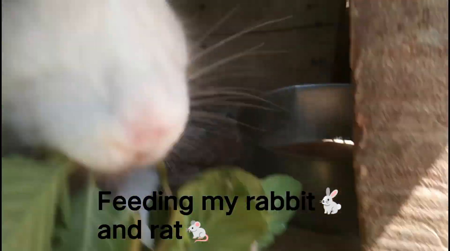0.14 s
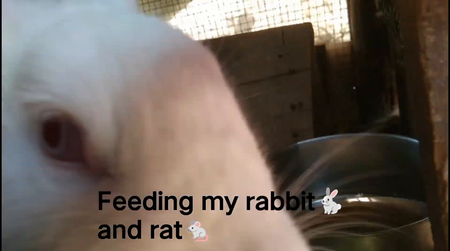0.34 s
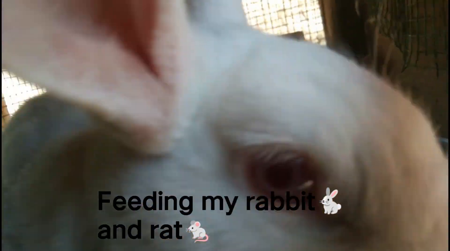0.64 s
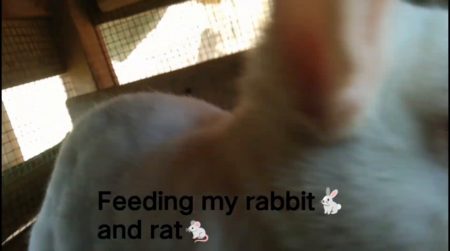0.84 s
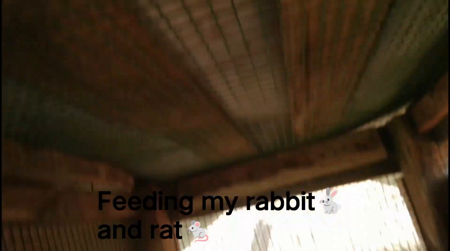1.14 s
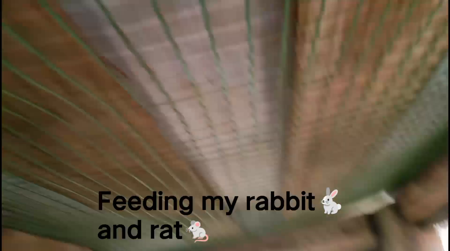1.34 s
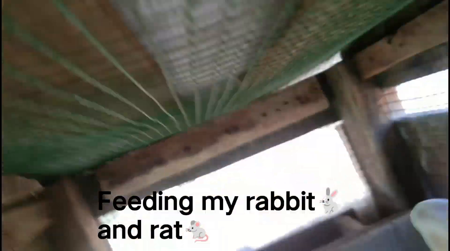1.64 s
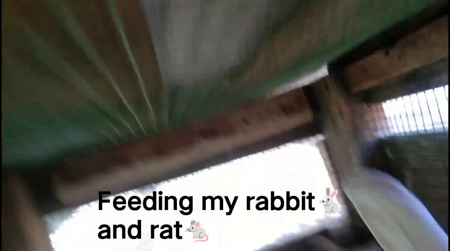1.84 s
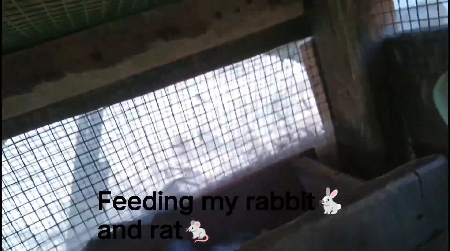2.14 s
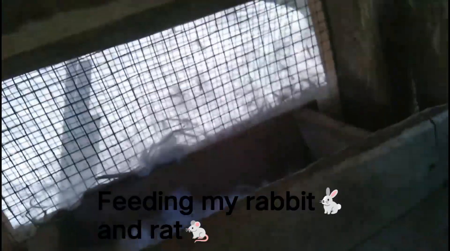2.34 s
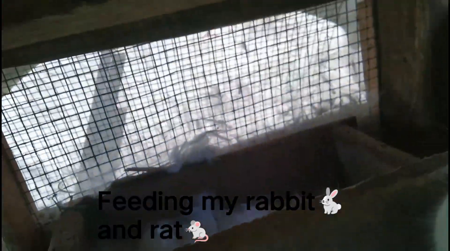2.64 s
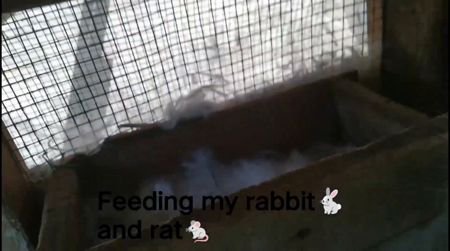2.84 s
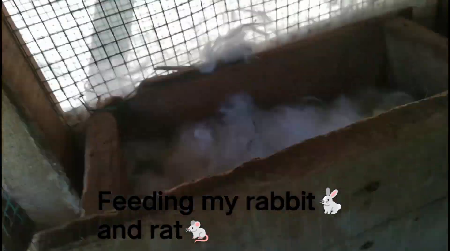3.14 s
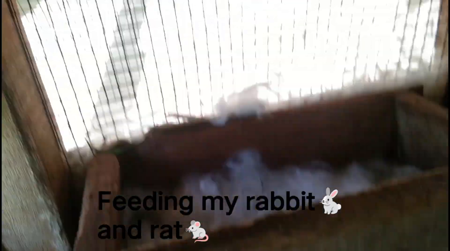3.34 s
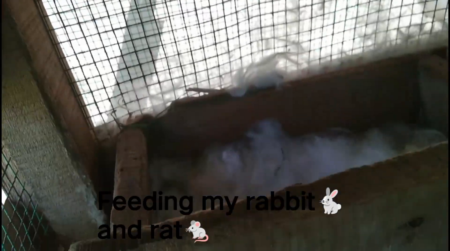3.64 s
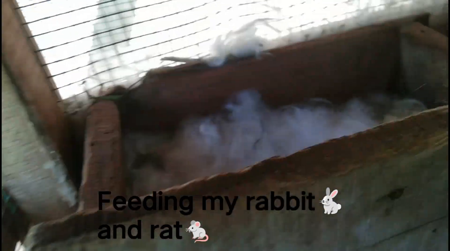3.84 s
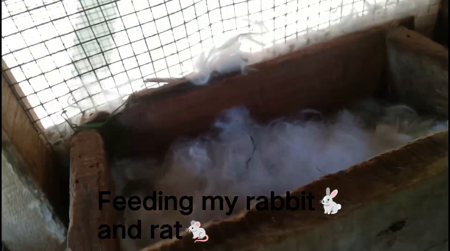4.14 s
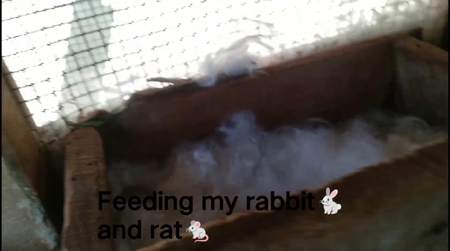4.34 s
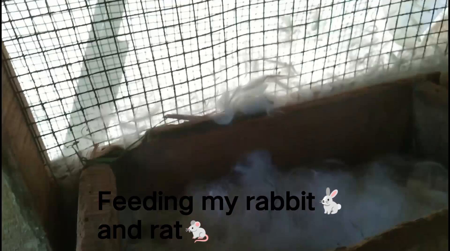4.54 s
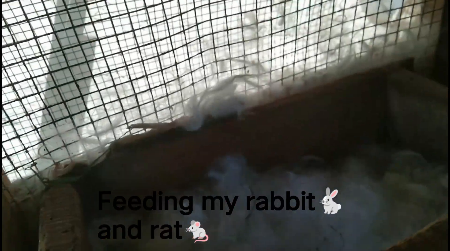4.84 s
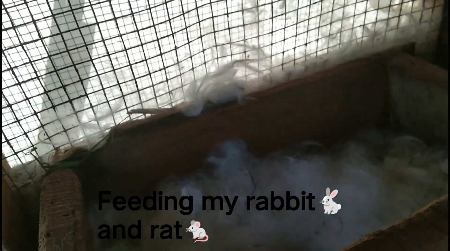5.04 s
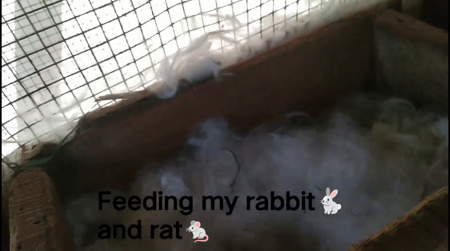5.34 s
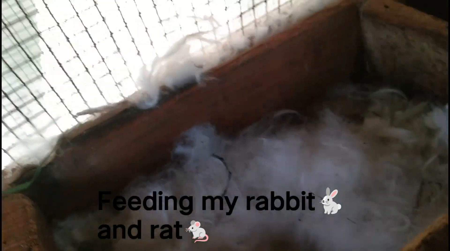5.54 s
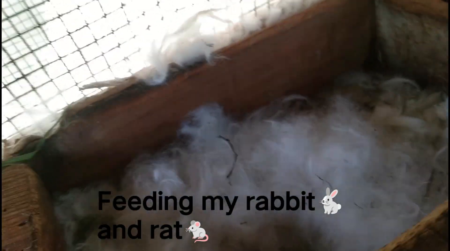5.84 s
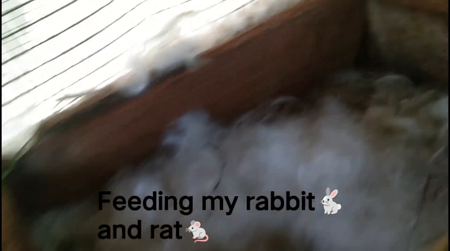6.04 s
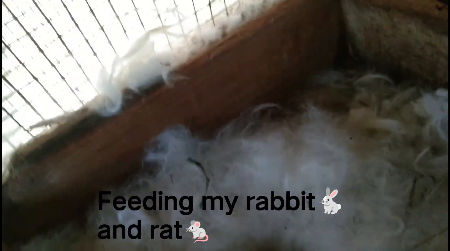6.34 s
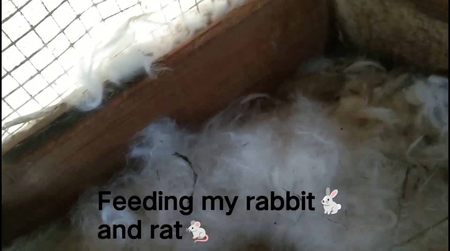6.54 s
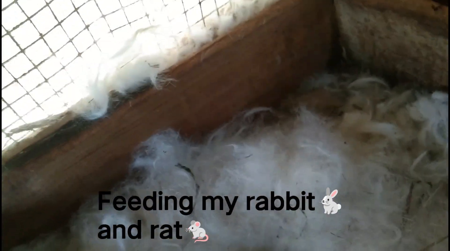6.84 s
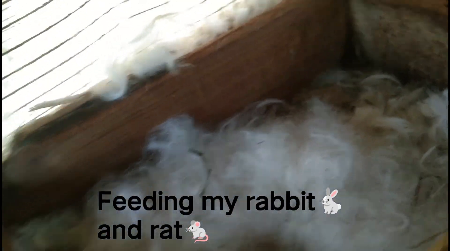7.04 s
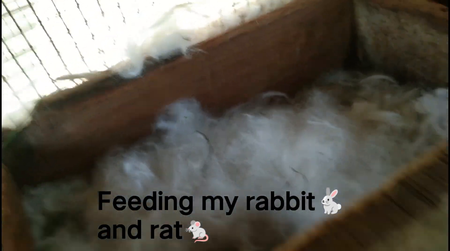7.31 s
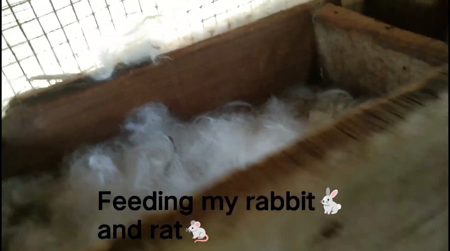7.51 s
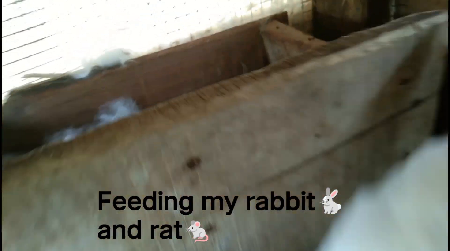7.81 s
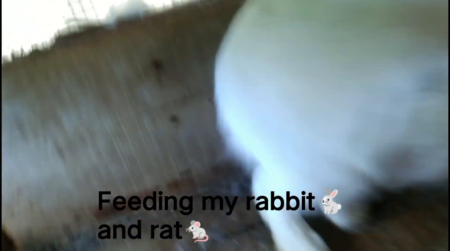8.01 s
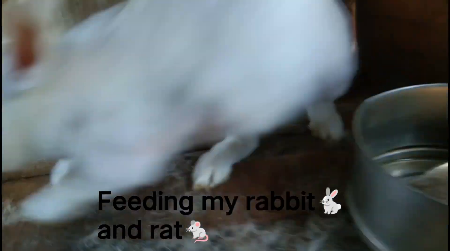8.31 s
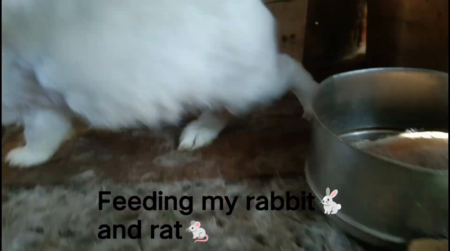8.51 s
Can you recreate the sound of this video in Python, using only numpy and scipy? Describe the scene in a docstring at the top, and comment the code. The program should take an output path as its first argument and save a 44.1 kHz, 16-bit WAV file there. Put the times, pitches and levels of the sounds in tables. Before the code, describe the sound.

Soft leaf crunching and sharp stem snaps from a rabbit in a wooden hutch, with paw thumps and a brief metal bowl clatter.

```python
"""A rabbit chews leaves in a wooden hutch, close to a small microphone.
Tiny cracks merge into a crisp rustle and a duller crunch inside the mouth; stems snap and leaves tear.
Its paws thump and shuffle on hollow boards, and knock a steel bowl that scrapes and rings briefly.
Outside, an insect trills very high over faint open air, a hiss of far insects and a few thin peeps."""
import sys
import numpy as np
from scipy import signal
from scipy.fft import rfft, irfft
from scipy.io import wavfile

SR = 44100
rng = np.random.default_rng(int(sys.argv[2]) if len(sys.argv) > 2 else 0)


def int16_out(signal):
    """Quantize to a 16-bit WAV file."""
    q = np.round(np.clip(np.atleast_2d(signal).T, -1, 1) * 32767)
    wavfile.write(sys.argv[1], SR, q.astype(np.int16))


N = 382347


def from_db(db):
    """Turns decibels into a number to multiply a sound by."""
    return 10 ** (np.asarray(db) / 20)


def rms_one(x):
    """Scales a sound so that its average strength (rms) is 1."""
    return x / np.sqrt(np.mean(x ** 2) + 1e-20)


def curves(rows):
    """Joins the rows of a table over time: one curve for each column after the first."""
    times, *columns = np.transpose(rows)
    return [np.interp(np.arange(N) / SR, times, column) for column in columns]


def coloured(x, points):
    """Makes some pitches louder than others, following (pitch [Hz], level [dB]) points; rms 1."""
    hz, level_db = np.transpose(points)
    log_hz = np.log(np.arange(1, N // 2 + 2) * SR / N)
    return rms_one(irfft(rfft(x) * from_db(np.interp(log_hz, np.log(hz), level_db)), N))


def drift(rate_hz):
    """A smooth random wobble of size about 1; a higher rate wobbles faster."""
    r = np.exp(-2 * np.pi * rate_hz / SR)
    return rms_one(signal.lfilter([1], [1, -2 * r, r * r], rng.standard_normal(N + SR))[SR:])


def ring(x, hz, ring_s):
    """Each click in x starts a tone that fades by 60 dB in ring_s seconds."""
    r, w = from_db(-60 / (ring_s * SR)), 2 * np.pi * hz / SR
    return signal.lfilter([0, np.sin(w)], [1, -2 * r * np.cos(w), r * r], x + 1e-18)


def band(x, hz, ring_s):
    """Rings x twice to keep the pitches near hz; longer ringing keeps a narrower band; rms 1."""
    return rms_one(ring(ring(x, hz, ring_s), hz, ring_s))


def grains(per_s, spread_db, size=N):
    """Random clicks of uneven size."""
    heights = from_db(spread_db * np.minimum(rng.exponential(1, size), 5)) * rng.choice([-1, 1], size)
    return heights * (rng.random(size) < per_s / SR)


def contact(seconds, size, rise=.11):
    """Strength of a touch: it grows over the share `rise` of its length, then fades."""
    progress = np.arange(size) / SR / max(seconds, 1e-4)
    return (1 - np.exp(-progress / max(rise, .005))) * np.exp(-1.6 * progress ** 2)


def swells(starts, hold_s, peak_db, rise_db_per_s, fall_db_per_s, build_db=0):
    """Follows the loudest of several swells that rise, hold (growing by build_db) and fall away."""
    times = np.arange(0, N + 88, 88) / SR
    age, hold = times - starts[:, None], np.c_[hold_s]
    slopes_db = rise_db_per_s * np.minimum(age, 0) - fall_db_per_s * np.maximum(age - hold, 0)
    level_db = peak_db[:, None] + slopes_db + build_db * (np.clip(age / hold, 0, 1) - .5)
    return np.interp(np.arange(N) / SR, times, from_db(level_db.max(axis=0)))


def add(out, start, sound, peak_db):
    """Mixes a sound into out at a start time in seconds, with the given peak."""
    piece = out[round(start * SR):][:len(sound)]
    piece += from_db(peak_db) * sound[:len(piece)] / np.abs(sound).max()


def struck(tones, push, spot_hz, octaves):
    """One push rings all the tones of an object; those near the struck spot's pitch ring most."""
    chance_db = rng.normal(0, 1.5, len(tones))
    out = 0
    for k, (hz, db, ring_s) in enumerate(tones):
        distance = np.log2(hz / spot_hz) / max(octaves, .1)
        out += from_db(db + chance_db[k] - 4.4 * distance ** 2) * ring(push, hz, ring_s) * (-1) ** k
    return out


# Tone colour of the open air: (pitch [Hz], relative level [dB])
AIR_COLOUR = [(15, -52), (25, -9), (43, -20), (92, 9.5), (170, 4), (240, -11), (317, 1), (405, 1),
              (796, -6.5), (2220, -10), (3920, -13.5), (9840, -14), (11300, -74), (12200, -50),
              (13200, -27), (16000, -44)]
def open_air():
    """A faint, mostly low rush whose level wavers slowly."""
    return from_db(-68.5 + .7 * drift(0.6)) * coloured(rng.standard_normal(N), AIR_COLOUR)


def far_insects():
    """Many insects further off merge into a steady, narrow hiss."""
    high_band = signal.butter(3, (10600, 12500), "band", fs=SR, output="sos")
    return from_db(-79.5 + 0.5 * drift(4.0)) * rms_one(signal.sosfilt(high_band, rng.standard_normal(N)))


# Thin peeps: (time [s], length [s], first pitch [Hz], last pitch [Hz], peak [dB])
PEEP_NOTES = [(0.082, 0.063, 4700, 4880, -62), (0.183, 0.046, 4450, 4400, -65),
              (1.798, 0.061, 7800, 7700, -52), (5.25, 0.077, 7000, 7000, -64),
              (5.66, 0.035, 7000, 7350, -61), (5.721, 0.044, 7200, 7000, -61), (6.39, .05, 5500, 4900, -66),
              (6.59, 0.083, 5600, 5500, -68), (8.297, 0.048, 3000, 3050, -61),
              (8.446, 0.044, 3870, 3900, -61)]
def peeps():
    """Short sliding whistles, perhaps far birds, that tremble in pitch and level."""
    out, waver = np.zeros(N), drift(126)
    for start, length, first_hz, last_hz, peak_db in PEEP_NOTES:
        at, size = round(start * SR), round(length * SR)
        hz = np.linspace(first_hz, last_hz, size) + 110 * waver[at:][:size]
        level = np.hanning(size) ** .5 * from_db(2.5 * waver[-at - size:][:size])
        add(out, start, level * np.sin(2 * np.pi * np.cumsum(hz) / SR), peak_db)
    return out


CHIRPS_PER_S, CHIRP_S, BEAT_AT_S = 35.7, .012, 6.732
CHIRP_START_HZ, CHIRP_END_HZ, CHIRP_DIP_DB = 12450, 10700, 7
# How the trill changes: (time [s], chirp start level [dB], chirp end level [dB], delay [ms])
TRILL = [(0, -70, -72, -8.5), (.35, -56, -56, -13), (1, -85, -82, -13), (2, -76, -68, -4),
         (3, -62, -71, -1), (4, -85, -86, 1), (4.75, -84, -74, 2.5), (5.0, -79, -72, 2.5),
         (5.25, -68, -74, 4), (5.45, -60, -76, -1), (6.05, -63, -85, -1.5), (6.2, -80, -80, -7),
         (6.4, -90, -90, -13), (6.5, -77, -63, -4), (7.0, -74, -61, 1.2), (7.3, -64, -70, -.3),
         (7.8, -72, -64, 1), (8.67, -78, -81, -8)]
def insect():
    """Almost evenly spaced chirps, each a quick, slightly blurred fall in pitch."""
    start_db, end_db, delay_ms = curves(TRILL)
    beats = (np.arange(N) / SR - BEAT_AT_S - delay_ms / 1000) * CHIRPS_PER_S
    progress = np.minimum((beats % 1) / (CHIRP_S * CHIRPS_PER_S), 1)   # 0 to 1 through each chirp
    hz = CHIRP_START_HZ + (CHIRP_END_HZ - CHIRP_START_HZ) * progress + 130 * drift(301)
    # each chirp sags in the middle, so a high and a low note stand out
    dip_db = CHIRP_DIP_DB * np.exp(-((progress - .5) / .12) ** 2)
    level_db = start_db + (end_db - start_db) * progress - dip_db + 1.2 * drift(500) + 0.6 * drift(8.8)
    return from_db(level_db) * np.sin(np.pi * progress) ** 0.45 * np.sin(2 * np.pi * np.cumsum(hz) / SR)


# Tone colour of the bowl's rim scraping on wood: (pitch [Hz], relative level [dB])
RIM_COLOUR = [(410, -17), (700, -15), (1330, -24), (2020, -10.5), (3070, -14.5), (3690, -11.5), (7690, -16),
              (9860, -9.5), (16000, -25)]
# The steel bowl's own tones: (pitch [Hz], relative level [dB], ring time [s])
BOWL_TONES = [(1140, 17.5, 0.047), (1473, 16, 1), (2050, -2, 0.2), (2160, -8, 0.11), (2623, 9.5, 0.18),
              (3060, 9.5, 0.051), (3710, 10.5, 0.072), (4120, 12, 0.027), (5220, 12, 0.066),
              (5600, 18, 0.028), (6370, 2, 0.04), (6900, 8, 0.036), (7700, 6, 0.052), (9200, 5, 0.038),
              (11000, 19.5, 0.021)]
# Knocks and slides: (time [s], peak [dB], contact [s], rise [share of contact], spot pitch [Hz],
# spread of ringing [octaves], scrape strength [times the ringing], longest ring the paw allows [s])
BOWL_KNOCKS = [(7.882, -53, 0.025, .3, 7300, 0.17, 0.2, 0.03),
               (7.902, -38, 0.0089, .02, 7300, 0.11, 0.25, 0.015),
               (7.912, -39.5, 0.027, .03, 7700, 0.13, 0.13, 0.015),
               (7.914, -45.5, 0.0063, .05, 2300, 2, 0.21, 0.89),
               (8.012, -25.5, 0.012, 0.5, 3440, 0.8, 1.2, 0.007),
               (8.054, -21, 0.019, 0.11, 5000, 1.3, 0.72, 0.017),
               (8.0873, -18, 0.006, .02, 3100, 0.46, 0.53, 0.0044),
               (8.093, -28, 0.012, .1, 2600, 0.37, 0.92, 0.004),
               (8.1023, -24, 0.013, 0.018, 2460, 0.33, 0.78, 0.0074),
               (8.123, -28, 0.0078, .02, 2380, 0.38, 0.98, 0.012),
               (8.179, -33.5, 0.0085, .02, 2360, 0.26, 0.43, 0.0027),
               (8.187, -29, 0.019, .3, 2100, 0.6, 2.6, 0.0019),
               (8.235, -42, 0.0062, .05, 3570, 0.91, 1.7, 0.015),
               (8.272, -48.5, 0.015, .11, 9700, 0.96, 2.6, .01)]
def bowl():
    """Each knock is a gritty scrape that rings the steel, while the paw cuts the ringing short."""
    out, grit = np.zeros(N), coloured(grains(12000, 0.62), RIM_COLOUR)
    for start, peak_db, seconds, rise, spot_hz, octaves, scrape, longest_s in BOWL_KNOCKS:
        rub = grit[round(start * SR):][:12000] * contact(seconds, size=12000, rise=rise)
        if rise < .04:   # a sudden knock starts with a tick
            rub[:14] += .7 * np.abs(rub).max() * np.sin(np.pi * np.arange(14) / 7)
        held_tones = [(hz, db, 1 / (1 / ring_s + 1 / longest_s)) for hz, db, ring_s in BOWL_TONES]
        steel = rms_one(struck(held_tones, rub, spot_hz, octaves))
        add(out, start, scrape * rms_one(rub) + steel, peak_db)
    return out


# The hollow floor's own tones: (pitch [Hz], relative level [dB], ring time [s])
FLOOR_TONES = [(120, -10.5, 0.087), (170, -25, 0.048), (190, -7.5, 0.14), (231, 13.5, 0.034),
               (280, 2, 0.066), (310, -7, 0.02), (399, 2, 0.043), (423, 0.5, 0.054), (483, 6, 0.01),
               (563, 1.5, 0.11), (670, 7, 0.064), (700, 11.5, 0.073), (910, 6.5, 0.082),
               (1064, 25.5, 0.059), (1330, 35, 0.022)]
# Paws landing: (time [s], peak [dB], spot pitch [Hz], spread of ringing [octaves])
PAW_THUMPS = [(0.12, -54, 340, 0.47), (0.248, -58, 430, 0.25), (0.354, -50.5, 600, 0.75),
              (0.544, -43.5, 142, 0.64), (0.55, -44, 1270, 0.45), (0.646, -42.5, 260, 2.9),
              (1.065, -56.5, 587, 0.24), (1.205, -50, 450, 0.35), (1.547, -37, 293, 0.5),
              (1.761, -42.5, 179, 0.12), (1.766, -48.5, 700, 0.11), (1.805, -56, 710, 0.12),
              (1.797, -56, 190, 0.27), (1.842, -44, 190, 1.1), (1.841, -49, 700, 0.14),
              (1.877, -45, 258, 0.94), (1.952, -51, 244, 0.25), (2.039, -27.5, 238, 0.38),
              (2.062, -30, 188, 0.5), (2.098, -48.5, 231, 0.12), (2.134, -47, 224, 0.064),
              (2.354, -50, 473, 0.62), (2.462, -48, 420, 1.02), (2.504, -44, 226, 0.36),
              (2.656, -45, 246, 0.8), (2.678, -40, 483, 0.81), (2.952, -40, 470, 0.79),
              (3.177, -48, 231, 0.14), (3.238, -38, 440, 0.63), (3.595, -46.5, 453, 0.66),
              (3.61, -48, 474, 0.79), (3.902, -38.5, 467, 0.26), (4.307, -52.5, 194, 0.17),
              (4.345, -55, 173, 0.48), (5.631, -45.5, 348, 2.8), (6.286, -55, 247, 0.21),
              (6.794, -57.5, 252, 0.52), (6.906, -61, 243, 0.52), (7.092, -46, 450, 0.43),
              (7.291, -44.5, 296, 0.81), (7.429, -41.5, 373, 1), (7.757, -43, 380, 0.75),
              (7.915, -49.5, 231.5, 0.087), (8.014, -25.5, 245, 0.37), (8.016, -39, 612, 0.12),
              (8.086, -33.5, 303, 0.33), (8.089, -53, 597, 0.55), (8.105, -47.5, 620, 0.67),
              (8.123, -43.5, 900, 0.56), (8.019, -49, 1040, 0.37), (8.103, -31, 263, 1.1),
              (8.188, -26.5, 280, 0.34), (8.187, -32, 730, 0.53), (8.268, -46, 293, 0.22),
              (8.408, -44, 246, .72), (8.45, -42.5, 233, 0.75), (8.499, -59, 596, 0.18)]
# Paws shuffling: (time [s], level [dB])
PAW_SHUFFLE = [(0.0, -100), (0.8, -80), (1.25, -66.5), (1.45, -71), (1.72, -64.5), (1.78, -45),
               (1.97, -62.5), (2.3, -71), (2.85, -72), (3.8, -71), (4.36, -69), (5.3, -73.5), (5.8, -76),
               (6.85, -74), (7.65, -74.5), (7.94, -54.5), (8.28, -51), (8.4, -78), (8.67, -67)]
# Fur and leaves dragging over the wood: (time [s], level [dB])
FUR_DRAG = [(0.0, -67), (0.38, -70), (1.0, -63.5), (1.28, -69.5), (2.34, -77), (2.56, -73.5), (4.42, -72.5),
            (4.6, -79), (6.71, -73.5), (6.95, -71), (7.65, -75), (8.09, -62.5), (8.26, -70), (8.67, -65)]
def floorboards():
    """Paws thump and shuffle, ringing the hollow floor, while fur and leaves drag over it."""
    thumps = np.zeros(N)
    for start, peak_db, spot_hz, octaves in PAW_THUMPS:
        seconds = np.interp(peak_db, [-50, -25], [0.011, 0.0033])   # harder landings are shorter
        scuff = rng.standard_normal(9000) * contact(seconds, size=9000)
        scuff[40] += 6.5   # the landing itself
        clack = band(scuff, spot_hz, 2.0 / spot_hz / max(octaves, .1))
        wood = rms_one(struck(FLOOR_TONES, clack, spot_hz, octaves))
        add(thumps, start, wood + 0.96 * clack, peak_db)
    shuffling = rms_one(struck(FLOOR_TONES, grains(600, 2.5), spot_hz=215, octaves=.7))
    dragging = band(grains(1500, 1.5), hz=460, ring_s=0.00059) * from_db(curves(FUR_DRAG)[0])
    # after each thump the paws shuffle on, softer and fading
    starts, peaks_db = np.transpose(PAW_THUMPS)[:2]
    settling = swells(starts, 0.0052, peaks_db - 20.5, rise_db_per_s=860, fall_db_per_s=114)
    return thumps + shuffling * np.hypot(from_db(curves(PAW_SHUFFLE)[0]), settling) + dragging


# Stems and leaf veins breaking: (time [s], peak [dB], pitch [Hz])
STEM_SNAPS = [(0.163, -36, 11100), (0.2851, -12.5, 10270), (0.2898, -53.5, 970), (0.294, -41, 11200),
              (0.2955, -36, 10800), (0.295, -47, 2500), (0.319, -38, 9970), (0.358, -56, 2380),
              (0.5418, -37, 6000), (0.5451, -19, 10500), (0.5453, -16, 5100), (0.548, -45, 1700),
              (0.6464, -38.5, 10600), (0.7531, -36, 9800), (0.835, -42, 9550), (0.841, -50.5, 6500),
              (0.888, -43, 9800), (0.9145, -42.5, 4400), (0.9147, -37.5, 9000), (0.922, -40, 11100),
              (0.934, -51, 6600), (0.9651, -40.5, 7300), (1.042, -29, 11300), (1.069, -46, 6040),
              (1.085, -44, 6500), (1.17, -43, 9000), (1.5008, -12.5, 9300), (2.0656, -47.5, 2780),
              (2.067, -39, 7700), (2.143, -51, 11900), (2.149, -43, 11000), (2.171, -36, 10200),
              (2.424, -35.5, 10600), (2.624, -34, 10700), (2.871, -40, 10500), (3.04, -42.5, 2570),
              (3.829, -45.5, 2690), (4.218, -39.5, 9300), (4.756, -36, 9450), (4.924, -45.5, 9900),
              (5.062, -52, 2880), (5.156, -60, 2600), (5.175, -54, 2700), (7.2888, -48.5, 3230),
              (7.289, -44.5, 9450), (7.8017, -55, 9900)]
def stem_snaps():
    """Each break is a click and a tone a few cycles long; loud ones ring less and click more."""
    out, click = np.zeros(N), signal.unit_impulse(600)
    sharp_click = signal.lfilter(*signal.butter(2, [1100, 12000], "band", fs=SR), click)
    faint_to_loud_db = [-25, -16]
    for start, peak_db, hz in STEM_SNAPS:
        cycles = np.interp(peak_db, faint_to_loud_db, [10, 6])
        sharpness = np.interp(peak_db, faint_to_loud_db, [0.078, 0.83])
        tone = band(click, hz, cycles / hz)
        add(out, start, tone / tone.max() + sharpness * sharp_click, peak_db)
    return out


# Bites through a leaf: (time [s], peak [dB], pitch [Hz], length [s])
LEAF_BITES = [(0.0044, -43, 3550, 0.013), (0.027, -44, 2600, 0.0089), (0.241, -47.5, 3850, 0.0081),
              (0.471, -50, 2640, 0.025), (0.677, -48, 1680, 0.0073), (0.697, -43.5, 2530, 0.0054),
              (0.768, -42.5, 8900, 0.031), (0.863, -50, 1250, 0.073), (1.06, -48, 1020, 0.034),
              (1.052, -45.5, 2500, 0.031), (1.064, -47, 3050, 0.03), (1.066, -49, 1900, 0.03),
              (1.207, -47.5, 1520, 0.038), (1.248, -48.5, 2750, 0.014), (1.545, -31, 9200, 0.013),
              (1.603, -37.5, 9400, 0.025), (1.763, -40, 1840, 0.0092), (1.764, -45, 1480, 0.013),
              (1.839, -47.5, 1670, 0.015), (2.448, -41.5, 9900, 0.013), (2.666, -51, 1600, 0.032),
              (2.876, -49.5, 2440, 0.024), (2.944, -56, 1520, 0.017), (3.028, -50, 2700, 0.024),
              (3.21, -50.5, 2260, 0.027), (3.23, -54, 1420, 0.038), (3.422, -47, 2500, 0.011),
              (3.573, -43, 9850, 0.021), (3.644, -41.5, 10200, 0.0097), (3.755, -53.5, 3260, 0.046),
              (3.831, -45, 2770, 0.0035), (3.921, -42, 9400, 0.025), (3.963, -50, 2800, 0.011),
              (4.047, -49.5, 3330, 0.021), (4.109, -52.5, 3270, 0.032), (4.3, -59.5, 1790, 0.11),
              (4.166, -52.5, 1330, 0.031), (4.207, -48.5, 2320, 0.015), (4.255, -61, 2050, 0.021),
              (4.446, -51.5, 2500, 0.023), (4.494, -57, 3080, .013), (4.654, -56, 2920, 0.0054),
              (4.68, -55.5, 3140, 0.011), (4.696, -51, 3000, 0.0063), (4.713, -60, 2640, .008),
              (4.701, -47, 9800, 0.018), (4.754, -56, 9650, 0.0068), (4.755, -47, 2780, 0.0036),
              (4.761, -46, 2710, 0.011), (4.856, -56.5, 3100, 0.011), (4.917, -61, 2600, 0.05),
              (5.072, -64, 2500, 0.026), (5.097, -58, 2560, 0.011), (5.185, -55, 2800, 0.0058),
              (5.212, -60, 2740, .015), (5.232, -55, 2700, .03), (5.207, -55, 9250, 0.017),
              (5.62, -54.5, 1620, 0.023), (5.39, -55, 2420, 0.033), (5.702, -56, 1500, 0.034),
              (5.847, -56.5, 1350, 0.022), (6.015, -66, 9250, 0.018), (6.068, -52, 6350, 0.035),
              (6.174, -52, 1370, 0.036), (6.451, -49.5, 1400, 0.038), (6.526, -53, 6160, 0.023),
              (6.676, -52.5, 1400, 0.035), (6.852, -54, 1400, 0.034), (7.023, -54, 1530, 0.03),
              (7.286, -49, 1070, 0.041), (7.288, -49, 2600, 0.015), (7.289, -47.5, 4800, 0.0085),
              (8.41, -48.5, 3300, 0.0095), (8.463, -51, 4370, 0.008), (8.553, -44.5, 1270, 0.016),
              (8.581, -49.5, 1260, 0.022), (8.647, -37.5, 10000, 0.0077)]
def bites():
    """Each bite is a burst of cracks, partly at one pitch and partly spread around it."""
    out = np.zeros(N)
    for start, peak_db, hz, length in LEAF_BITES:
        rise = np.interp(length, [.02, .05], [.1, .4])
        cracks = grains(3000, 2.5, size=4000) * contact(length, size=4000, rise=rise)
        cracks[60] += 2.0   # a sharper crack leads
        top_hz = hz * (1.25 if hz > 1800 else 2.4)   # low bites crackle well above their pitch
        wide_band = signal.butter(3, [.78 * hz, top_hz], "band", fs=SR, output="sos")
        crackle = rms_one(signal.sosfilt(wide_band, cracks))
        add(out, start, band(cracks, hz, 6.5 / hz) + .7 * crackle, peak_db)
    return out


PITCH_SLOTS = 30   # how many pitches a leaf crack can have
# Tone colour of cracking leaf edges: (pitch [Hz], relative level [dB])
LEAF_COLOUR = [(3000, -15), (4300, -3.5), (5600, -1), (6800, -2.5), (8200, 1), (9500, 3.5), (11000, 3.5),
               (12500, -5.5), (13500, -19), (15500, -10)]
def leaf_rustle(sizzle, ticks, slots):
    """Leaf edges crack in a fine sizzle, each crack at its slot's pitch; ticks span all the slots."""
    pitches = np.geomspace(3000, 15500, PITCH_SLOTS)
    leaf_hz, leaf_db = np.transpose(LEAF_COLOUR)
    levels_db = np.interp(np.log(pitches), np.log(leaf_hz), leaf_db)
    tilt, arch = drift(5.0), drift(5.0)   # the tone colour keeps shifting
    out = np.zeros(N)
    for k, hz in enumerate(pitches):
        place = np.pi * k / (PITCH_SLOTS - 1)
        flicker_db = 2.6 * drift(22)
        shift_db = 2.2 * (tilt * np.cos(place) + arch * np.cos(3 * place))
        cracks = band(sizzle * (slots == k) + ticks, hz, 34.0 / hz)
        out += from_db(levels_db[k] + flicker_db + shift_db) * np.sqrt(hz) * cracks
    return rms_one(out)


# Pitches that stand out in the mouth's crunch: (pitch [Hz], width [Hz], relative level [dB])
MOUTH_BANDS = [(2150, 350, -1.5), (2480, 350, -3), (2800, 400, -1.5), (3180, 350, 0), (4200, 450, -5),
               (1450, 550, -5.5)]
def mouth_crunch(slots):
    """Cracks inside the mouth sound duller; each rings the one band that its slot picks."""
    cracks, out = grains(2600, 2.6), np.zeros(N)
    for k, (hz, width_hz, db) in enumerate(MOUTH_BANDS):
        ring_s = np.log(1000) / np.pi / width_hz
        out += from_db(db) * band(cracks * (slots % len(MOUTH_BANDS) == k), hz, ring_s)
    return rms_one(out)


RISE_DB_PER_S, FALL_DB_PER_S = 374, 529   # a swell stops more sharply than it starts
# Rustling between the swells: (time [s], crisp level [dB], dull level [dB])
BETWEEN_SWELLS = [(0, -67.5, -73.5), (1.3, -67, -75.5), (2.0, -80, -88), (2.3, -76, -96), (2.7, -70, -73.5),
                  (3.1, -71.5, -76.5), (4, -66.5, -93), (5.5, -75.5, -76), (5.9, -103, -101),
                  (7.0, -80.5, -100), (7.7, -79, -88), (8.1, -65.5, -65), (8.3, -85, -87), (8.67, -83, -81)]
# Swells of rustle and crunch: mostly chews, and near 8 s the rustle as the bowl is knocked:
# (time [s], length [s], crisp level [dB], dull level [dB])
RUSTLE_SWELLS = [(0.0, 0.023, -55, -68), (0.092, 0.085, -68.5, -75), (0.224, 0.034, -84, -86),
                 (0.3, 0.12, -62, -78), (0.462, 0.069, -62.5, -68.5), (0.63, 0.03, -76, -71),
                 (0.688, 0.032, -59.5, -75), (0.758, 0.049, -70, -74), (0.89, 0.047, -57.5, -78),
                 (1.069, 0.01, -47.5, -60), (1.125, 0.028, -57, -63.5), (1.183, 0.083, -61, -69.5),
                 (1.3, 0.054, -72, -82), (1.42, 0.035, -68, -72), (1.506, 0.023, -61, -63.5),
                 (1.552, 0.013, -50.5, -62), (1.578, 0.046, -57.5, -64.5), (1.698, 0.01, -55.5, -65),
                 (1.748, 0.091, -59.5, -69), (1.955, 0.037, -71.5, -75), (2.07, 0.0073, -61.5, -64),
                 (2.138, 0.067, -65, -72), (2.378, 0.11, -63, -72.5), (2.573, 0.047, -62.5, -71),
                 (2.664, 0.009, -63.5, -65), (2.745, 0.24, -62.5, -84), (3.027, 0.044, -62, -72),
                 (3.181, 0.081, -65, -69.5), (3.322, 0.06, -68, -75), (3.448, 0.022, -58.5, -63.5),
                 (3.569, 0.095, -63.5, -67.5), (3.764, 0.024, -61, -63.5), (3.837, 0.017, -58.5, -68.5),
                 (3.908, 0.026, -71, -63.5), (4.028, 0.05, -66.5, -66.5), (4.107, 0.022, -69, -73),
                 (4.2, 0.082, -66.5, -69), (4.374, 0.094, -61.5, -67), (4.533, 0.11, -59.5, -68.5),
                 (4.745, 0.051, -58, -68), (4.92, 0.032, -70, -70), (4.993, 0.044, -84, -81),
                 (5.077, 0.023, -66.5, -65), (5.16, 0.176, -67.5, -74), (5.38, 0.036, -71, -78),
                 (5.52, 0.059, -74.5, -78), (5.626, 0.033, -69.5, -81), (5.684, 0.042, -64.5, -74),
                 (5.84, 0.024, -71.5, -74), (6.016, 0.071, -64.5, -70), (6.189, 0.014, -68, -76),
                 (6.464, 0.031, -68, -85), (6.672, 0.034, -69.5, -72), (6.84, 0.053, -76, -89),
                 (7.02, 0.082, -91, -75.5), (7.458, 0.03, -67, -73.5), (7.907, 0.02, -59, -83),
                 (8.008, 0.016, -59.5, -67), (8.134, 0.11, -62.5, -64), (8.26, 0.025, -71, -65.5),
                 (8.31, 0.075, -68.5, -75), (8.4, 0.02, -61, -76), (8.46, 0.012, -65, -77),
                 (8.55, 0.045, -66.5, -75), (8.662, 0.024, -63, -60.5)]
def chewing_and_rustling():
    """The crisp rustle and the dull crunch swell together, in quick flurries of tiny cracks."""
    starts, lengths, crisp_db, dull_db = np.transpose(RUSTLE_SWELLS)
    crisp_swells = swells(starts, lengths, crisp_db, RISE_DB_PER_S, FALL_DB_PER_S)
    dull_swells = swells(starts, lengths, dull_db, RISE_DB_PER_S, FALL_DB_PER_S, build_db=1)
    crisp_between, dull_between = from_db(curves(BETWEEN_SWELLS))
    flurries = from_db(2.0 * drift(45))
    sizzle, ticks = grains(per_s=12000, spread_db=1.9), grains(per_s=30, spread_db=2.5)
    slots = rng.integers(0, PITCH_SLOTS, N)   # a random pitch slot for every possible crack
    crisp = leaf_rustle(sizzle, ticks, slots) * np.hypot(crisp_between, crisp_swells)
    dull = mouth_crunch(slots) * np.hypot(dull_between, dull_swells)
    return flurries * (crisp + dull)


def hutch_echoes(sound):
    """The direct sound, followed by faint, very short echoes off the hutch walls."""
    echoes = signal.unit_impulse(1200)
    echoes[12:] = from_db(-29) * rng.standard_normal(1188) * np.exp(-np.arange(1188) / SR / 0.002)
    return signal.fftconvolve(sound, echoes)[:N]


def scene():
    """The rabbit in its hutch and the sounds outside, all at one microphone."""
    rabbit = chewing_and_rustling() + stem_snaps() + bites() + floorboards() + bowl()
    return (hutch_echoes(rabbit) + open_air() + insect() + far_insects() + peeps())[None]


def record(dry):
    """The small microphone loses the bass, and the very highest pitches are cut."""
    bass_cut = signal.butter(2, 87, "high", fs=SR, output="sos")
    top_cut = signal.cheby2(12, 60, 16250, fs=SR, output="sos")
    return signal.sosfilt(top_cut, signal.sosfilt(bass_cut, dry))


dry = scene()
out = record(dry)
int16_out(out)
```